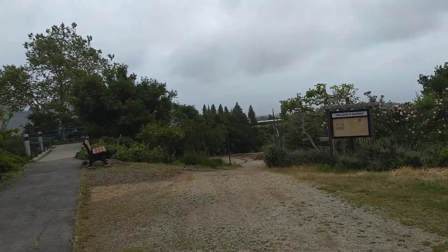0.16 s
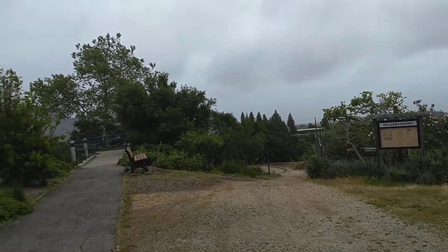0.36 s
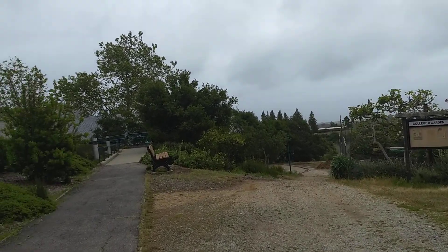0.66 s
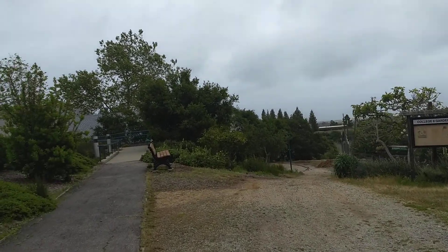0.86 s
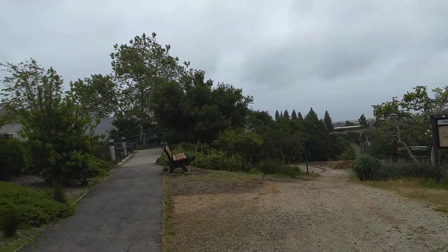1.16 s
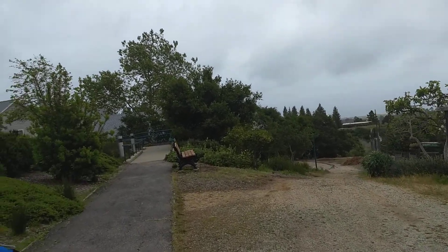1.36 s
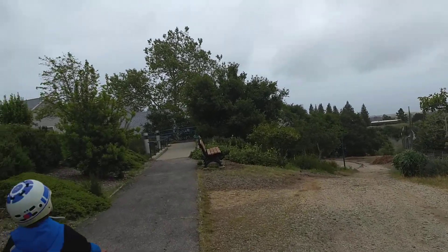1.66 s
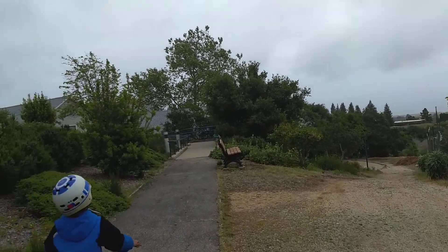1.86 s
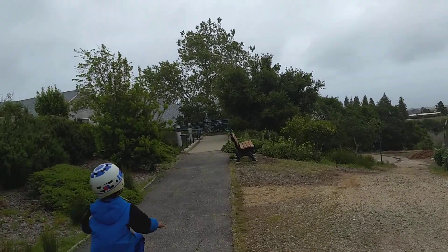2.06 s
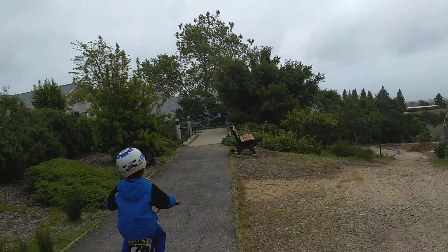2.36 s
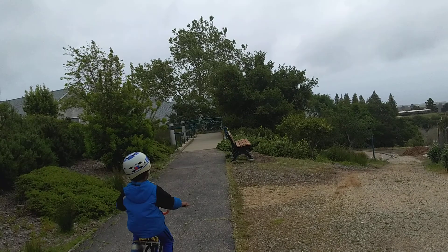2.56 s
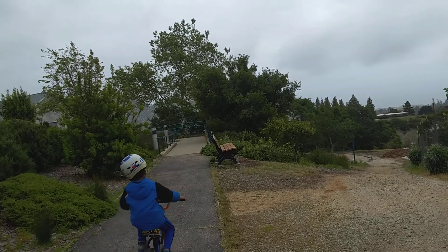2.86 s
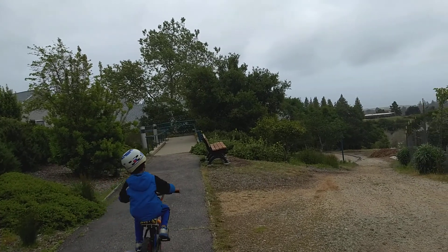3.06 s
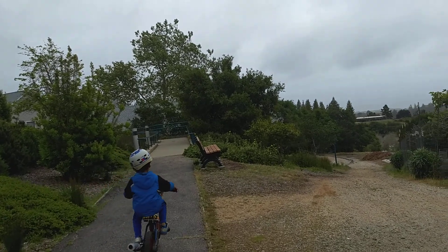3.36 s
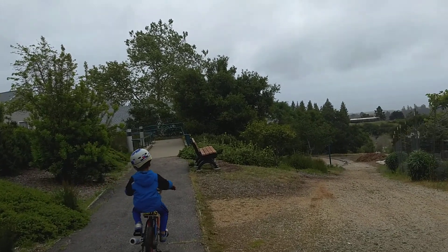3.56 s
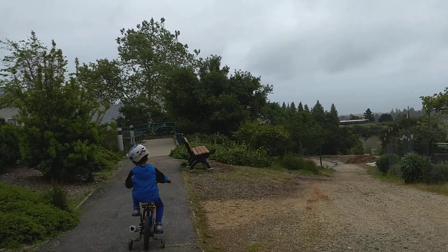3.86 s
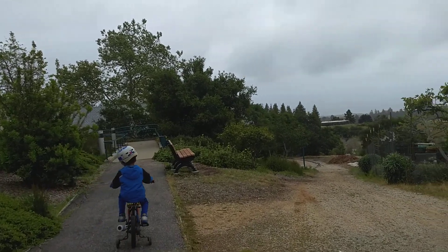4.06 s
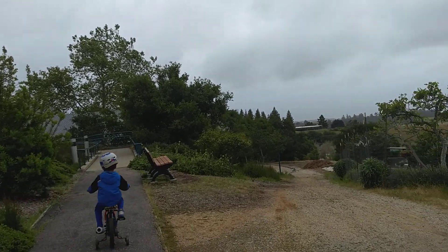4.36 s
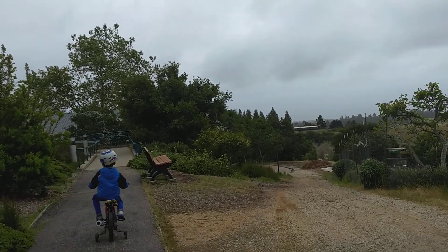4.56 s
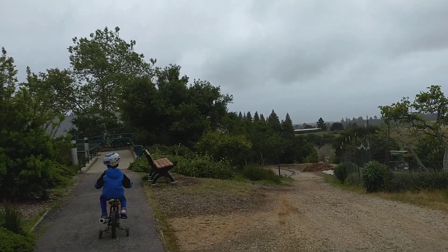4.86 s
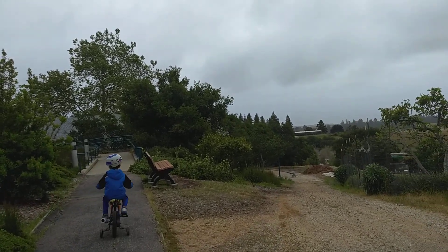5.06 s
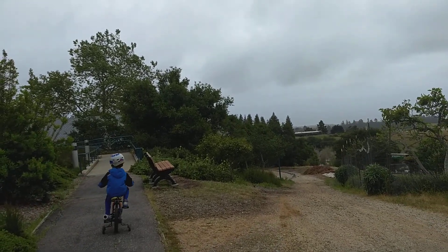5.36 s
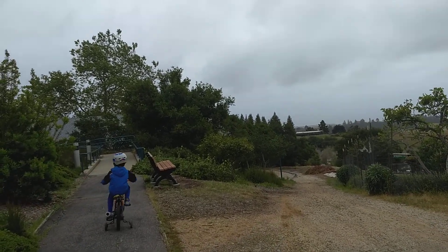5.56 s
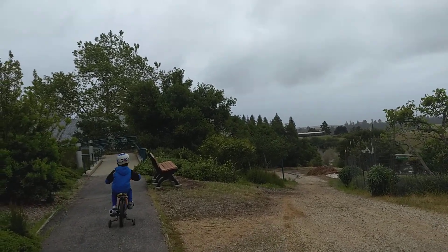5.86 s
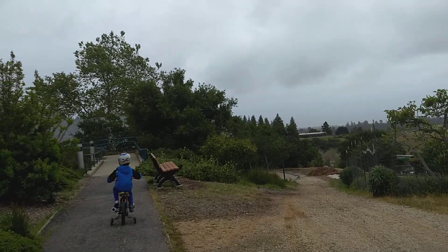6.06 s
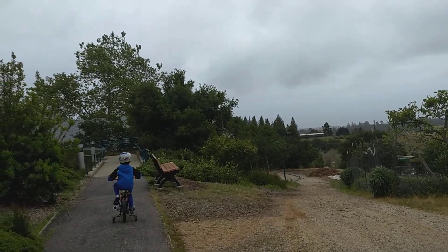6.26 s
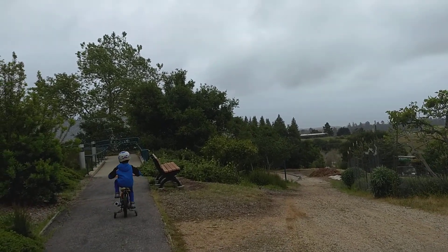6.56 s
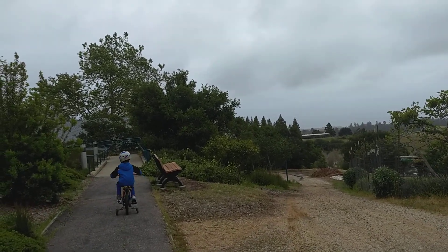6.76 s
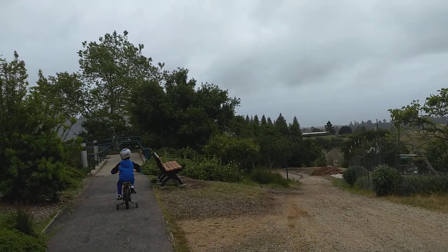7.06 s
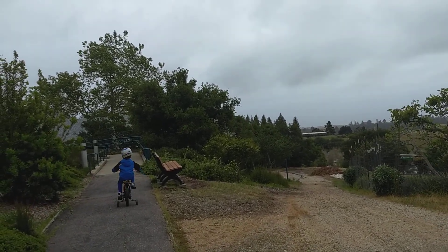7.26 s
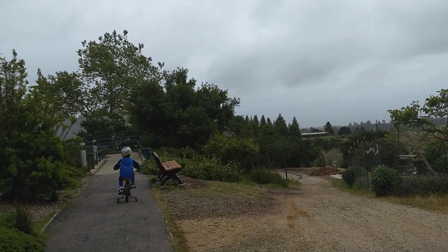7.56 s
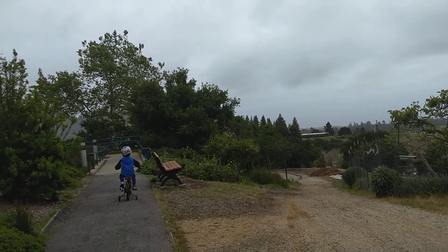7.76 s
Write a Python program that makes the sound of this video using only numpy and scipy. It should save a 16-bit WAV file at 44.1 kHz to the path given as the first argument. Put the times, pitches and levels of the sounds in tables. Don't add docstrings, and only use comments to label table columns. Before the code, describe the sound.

From 0 to about 1.1 seconds a small bicycle with hard stabiliser wheels is very close, with hollow knocks, rough gritty rolling and a dense clatter of sharp loose-frame ticks, as deep wind thumps crowd the microphone around 0.5 to 1 second. From 1.2 to 3.5 seconds bright chain clicks tick irregularly over the rumbling wheels, with another frame rattle near 2.4 and low gust pops around 2.2 to 2.5. From 3.5 to 5 seconds it draws away, thinner and softer, with a wind thump near 4.3 and a few knocks near 4.6. After 5 seconds the rolling is faint, with small uneven ticks and brief rattles around 6.2 to 6.5 and 7.1; wind swells strongly near 6.7 and returns near 7.8. A faint distant machine hum, breathy whine and dull air continue throughout. Wide outdoor stereo, with wind very uneven between the microphones.

```python
import sys
import numpy as np
from scipy import signal
from scipy.io import wavfile
from scipy.ndimage import map_coordinates

SR = 44100
rng = np.random.default_rng(int(sys.argv[2]) if len(sys.argv) > 2 else 0)


def pcm_store(signal):
    levels = np.round(np.clip(np.atleast_2d(signal), -1, 1) * 32767)
    wavfile.write(sys.argv[1], SR, levels.astype(np.int16).T)


def boost(x):
    u = np.asarray(x, float) / 20
    return 10 ** u


N = 348390


def in_time(rows):
    s, *columns = np.transpose(rows)
    return [np.interp(np.arange(N) / SR, s, c) for c in columns]


def swells(rows, edge_s):
    t = np.arange(N) / SR
    out = np.zeros((len(rows[0]) - 2, N))
    for s, length, *db in rows:
        near = slice(max(int((s - edge_s) * SR), 0), int((s + length + edge_s) * SR))
        to_edge = np.minimum(t[near] - s, s + length - t[near])
        out[:, near] += np.outer(db, np.clip(to_edge / edge_s + .5, 0, 1))
    return out


def rms_one(x):
    return x / np.sqrt(np.mean(x ** 2) + 1e-20)


def drift(rate):
    r = np.exp(-80 * np.pi * rate / SR)
    noise = rng.standard_normal(N // 40 + 2002)
    slow = signal.lfilter([1], [1, -2 * r, r * r], noise)[2000:]
    return np.interp(np.arange(N) / 40, np.arange(len(slow)), rms_one(slow))


def resonate(x, hz, width):
    r = np.exp(-np.pi * width / SR)
    b = np.sqrt((1 - r * r) / 2) * np.array([1, 0, -1])
    return signal.lfilter(b, [1, -2 * r * np.cos(2 * np.pi * hz / SR), r * r], x)


def band(x, low_hz, high_hz, order=2):
    return signal.sosfilt(signal.butter(order, [low_hz, high_hz], "band", fs=SR, output="sos"), x)


def contacts(at, sizes, t60):
    train = np.zeros(N) + 1e-18
    np.add.at(train, at, sizes)
    return signal.lfilter([1], [1, -boost(-60 / (t60 * SR))], train)


def blows(events, cycles, offset_db):
    out = np.zeros(N + SR)
    for s, peak_db, hz in events:
        turns = np.arange(int(cycles * SR / hz)) * hz / SR
        fade = boost(-40 * turns / cycles) * np.minimum(turns / 0.5, 1)
        start = int(s * SR)
        out[start:start + len(turns)] += boost(peak_db + offset_db) * np.sin(2 * np.pi * turns) * fade
    return out[:N]


# (pitch [Hz], level [dB])
MACHINE_HUM = [
    (343, -46.5),
    (361, -48),
]
# (time [s], hum [dB], whine [dB])
MACHINE_SWELL = [(0, 3.5, 4.5), (1, -5.5, 1.5), (4.2, -4, 0.5), (4.8, -1, 2.5), (5.6, 0, -6.5),
                 (7.9, -1, 4.5)]


def distance():
    t = np.arange(N) / SR
    hum_db, whine_db = in_time(MACHINE_SWELL)
    lines = [boost(db + 1.7 * drift(0.26)) * np.sin(2 * np.pi * hz * t) for hz, db in MACHINE_HUM]
    hum = sum(lines) * boost(hum_db)
    whine = boost(-49.5 + whine_db) * resonate(rng.standard_normal(N), hz=410.8, width=17)
    common, left, right = rms_one(band(rng.standard_normal((3, N)), 220, 710, order=1))
    air = boost(-55.5) * (common + 1.2 * np.array([left, right]))
    return hum * boost([[3.0], [-3.0]]) + whine * boost([[4.0], [-12.0]]) + air


# (time [s], rumble [dB], upper flutter relative [dB])
BREEZE_LEVEL = [(0.0, -51.5, -2.5), (0.7, -31.5, 3), (1.25, -57.5, 1), (2.0, -38.5, -2.5),
                (2.9, -47.5, 0.5), (3.35, -55.5, 0.5), (4.1, -44.5, -6.5), (4.9, -51.5, -9.0),
                (5.6, -43, -7.5), (6.6, -30.5, 0), (7.2, -51.0, -12), (7.9, -36.5, 1.0)]
# (start [s], length [s], rise [dB], extra rise of the flutter [dB])
GUST_RISES = [(0.0, 0.073, 11.5, 10), (0.11, 0.055, 13, -3), (0.49, 0.06, 11, -2), (0.88, 0.025, 4, 7),
              (1.01, 0.044, 11, -3), (1.2, 0.095, 8.0, 2.0), (1.47, 0.12, 6.5, 7.5), (2.16, 0.15, 9, 11),
              (2.46, 0.17, 0, 8), (2.75, 0.024, 12, -1), (2.88, 0.15, 13.0, -10), (3.04, 0.14, 18.5, -1),
              (3.4, 0.045, 14, 4), (3.59, 0.27, 12.0, -1.0), (3.95, 0.11, 18.0, 7.5), (4.29, 0.29, 10.5, 4),
              (4.77, 0.047, 13.5, -2), (4.89, 0.048, 7, 6), (5.07, 0.05, 8, -4.0), (5.27, 0.12, 5, -13),
              (5.51, 0.082, 15, -1), (5.7, 0.072, 8, 3.0), (6.02, 0.23, -3.5, -11), (6.7, 0.11, 3.5, 4),
              (6.83, 0.11, 10.5, 3.5), (7.09, 0.04, 7, 6.0), (7.2, 0.032, 5, 5), (7.25, 0.059, 14, 13),
              (7.51, 0.04, 3, 4), (7.74, 0.18, 5.5, -2)]
# (time [s], peak [dB], pitch [Hz])
EDDY_POPS = [(0.036, -40, 271), (0.505, -13.5, 145), (0.636, -13, 101), (0.714, -10.5, 115),
             (0.874, -18, 140), (1.014, -18.5, 116), (2.152, -14, 205), (2.242, -13.5, 170),
             (2.278, -15, 200), (2.497, -16, 200), (2.758, -26, 103), (3.033, -38, 86.1), (3.976, -22, 122),
             (4.319, -11, 167), (4.774, -28, 103), (5.706, -21.5, 161), (6.12, -14, 113),
             (6.273, -21, 95.5), (6.708, -15, 168), (6.838, -17, 250), (7.684, -20.5, 81.4),
             (7.803, -26, 117)]


def wind():
    rumble_db, flutter_db = in_time(BREEZE_LEVEL) + swells(GUST_RISES, edge_s=0.038)
    white = rng.standard_normal((2, 2, N))
    lumps = boost(5.0 * np.array([drift(22), drift(43.4)]))
    deep = rms_one(band(white[0] * lumps, 42.5, 150.4, order=3))
    flutter = rms_one(band(white[1] * lumps, 162, 294))
    gusts = boost(rumble_db + 18.5) * (deep + boost(flutter_db - 11.0) * flutter)
    sheltered_db = -18.5
    pops = blows(EDDY_POPS, cycles=6.4, offset_db=13.0)
    return gusts * [[boost(sheltered_db)], [1]] + pops * [[0], [1]]


# (time [s], load on the wheels [dB], frame looseness relative [dB], pull on the chain [dB])
RIDE_LEVEL = [(0.0, -34, -9, -75), (0.3, -37.5, -5.5, -41), (0.7, -34, -4, -48.5),
              (1.1, -37.5, -10.5, -45.5), (1.45, -39.5, -5.5, -42), (1.75, -34, -7.5, -35.0),
              (2.3, -35, -0.5, -44.5), (2.65, -42, -4.5, -41.5), (3.1, -39.0, -1.5, -40.0),
              (3.6, -37, -2.5, -38.5), (4.2, -38.5, -2, -41), (4.45, -41, -7, -40.0), (5.1, -50.5, -2, -55),
              (5.6, -50, -10.5, -56), (6.3, -47.5, -2.5, -61.5), (6.8, -50.0, 3.5, -43.5),
              (7.3, -46, -5, -47.5), (7.9, -51, -1, -49.0)]
# (start [s], length [s], shake of chain [dB], shake of wheels and frame [dB])
PAVING = [(0.24, 0.074, -31, -2), (0.52, 0.15, 6, 2), (1.47, 0.099, -5.5, -3), (1.56, 0.1, 4, 4.5),
          (1.74, 0.042, -25, -3), (1.93, 0.034, -11, -6.5), (2.62, 0.08, -7, -2), (2.78, 0.1, -12, 2.5),
          (3.22, 0.04, -8, -3), (3.36, 0.074, -11, -2.5), (3.68, 0.071, 0, 1), (3.78, 0.047, -13, -4.5),
          (3.99, 0.12, -5, -2.5), (4.34, 0.17, -11.5, -12), (4.61, 0.1, -11.5, -2.5), (4.74, 0.085, 5, 5.5),
          (4.98, 0.091, 7.5, 1), (5.16, 0.042, 11.5, 1), (5.38, 0.1, 8, 1), (5.82, 0.2, 11, -1.5),
          (6.03, 0.091, 5, -2.5), (6.19, 0.048, 15, -4), (6.23, 0.074, 1.5, -6), (6.38, 0.054, 7.5, 5.5),
          (6.47, 0.016, -7, 14), (6.68, 0.097, -9, 0.5), (6.91, 0.11, -8, -2.5), (7.19, 0.08, -7, -2),
          (7.45, 0.044, -9, 1.5), (7.49, 0.09, 1, 7.5)]


def ride_levels():
    load_db, loose_db, pull_db = in_time(RIDE_LEVEL)
    chain_shake_db, wheel_shake_db = swells(PAVING, edge_s=0.016)
    wheels_db = load_db + wheel_shake_db
    chain_db = pull_db + chain_shake_db
    return [wheels_db, wheels_db + loose_db, chain_db, chain_db - 7.5]


# (time [s], peak [dB], strongest pitch [Hz], bright edge relative [dB])
LOOSE_FRAME_TICKS = [(0.0575, -11.5, 3700, -32), (0.1085, -10.5, 3700, -7), (0.17, -16.5, 3000, -24),
                     (0.3932, -19, 2930, 6), (0.4708, -14, 3100, -23), (0.509, -12, 3600, -12),
                     (0.5324, -23, 3500, 4), (0.595, -29, 3530, -19), (0.625, -18, 4000, -14),
                     (0.677, -13.5, 3900, -3), (0.705, -13, 4080, -4), (0.756, -12, 3030, -21),
                     (0.804, -10.5, 3820, -6), (0.832, -19, 3680, -23), (0.9008, -11.5, 3470, -26),
                     (0.951, -22, 3350, -12), (1.023, -5, 3830, -32), (1.0967, -11, 3240, -4),
                     (1.348, -18, 3400, -24), (2.173, -11, 3030, -18), (2.355, -9, 3020, -8),
                     (2.4186, -11.5, 3000, -25), (2.4336, -12.5, 3100, -24), (3.4676, -14.5, 2980, -17),
                     (6.2173, -13, 8100, 0), (6.4791, -15, 2850, -11), (6.499, -20, 2900, -27)]
# (time [s], peak [dB], bright edge relative [dB])
CHAIN_TICKS = [(0.139, -18.5, 6.5), (0.3151, -11, -2), (0.4437, -7, -3), (1.1799, -21, 1),
               (1.2835, -10.5, -18), (1.4554, -19, -5), (1.5128, -22, -12), (1.5602, -18, -19),
               (1.5924, -20, -20), (1.6195, -27, -11), (1.7052, -24, -5), (1.73, -14, 3),
               (1.7799, -10, -14), (1.8195, -17, -9), (1.8422, -19, -17), (1.9037, -12, 2),
               (1.9778, -10, -10), (2.009, -18, -8), (2.0926, -16, -7), (2.3185, -16, -10),
               (2.5125, -17.5, 1), (2.735, -26, -12), (2.8392, -20.5, 1.5), (2.8804, -18, -13),
               (3.031, -11, -0.5), (3.2226, -15.5, -2), (3.266, -16, -6), (3.279, -19, -1),
               (3.4418, -21.5, -8), (3.6561, -13, -8),
               (3.907, -13, -17), (4.1866, -20, -18), (4.265, -18.5, -13), (4.295, -21, -15),
                   (4.473, -22, -9), (4.706, -22.5, -6), (4.879, -18.5, -20), (4.98, -21, -21),
                   (5.0246, -21.5, -19), (5.0866, -22.5, -20), (5.1882, -24, -18), (5.2805, -17, -14),
                   (5.3936, -21.5, -11), (5.5693, -21.5, -19), (5.6291, -18.5, -6), (5.8168, -23, 0),
                   (5.845, -21, -15), (6.019, -21, -16), (6.0517, -17.5, -3), (6.755, -15.5, -16),
                   (6.9585, -19, -15), (7.0265, -24, -4), (7.0503, -15.5, 0.5), (7.0834, -20, 0),
                   (7.112, -18, -2), (7.3266, -43, -18), (7.377, -20, -19), (7.8105, -21, -9),
                   (7.8222, -18, -15)]


def ticks():
    chain_hz = 6300
    chain = [(s, db, chain_hz, edge) for s, db, edge in CHAIN_TICKS]
    return np.transpose(LOOSE_FRAME_TICKS + chain)


# (time [s], peak [dB], pitch [Hz])
WHEEL_KNOCKS = [(0.106, -11, 915), (0.124, -6.5, 940), (0.168, -16, 950), (0.231, -18, 920),
                (0.248, -16.5, 910), (0.315, -20, 900), (0.372, -17.5, 890), (0.508, -14.5, 950),
                (0.533, -17, 910), (0.578, -19.5, 990), (0.626, -16, 905), (0.831, -19, 1030),
                (0.899, -20.5, 830), (1.025, -14, 980), (1.343, -25, 710), (1.637, -14, 1260),
                (1.899, -22, 750), (1.953, -21, 685), (2.882, -24, 700), (3.442, -24.5, 736),
                (3.467, -28, 775), (4.575, -17.5, 1440), (4.598, -26, 1020)]


def wheel_knocks():
    knocks = blows(WHEEL_KNOCKS, cycles=14.0, offset_db=-2.5)
    return np.array([knocks, 0.44 * knocks, 0 * knocks])


# (pitch [Hz], likeness [0-1], left over right [dB])
PORT_PICKUP = [(560, 0.89, 4), (2080, 0.54, 0.5), (3800, 0.96, 1), (6040, 0.41, -9.5), (9330, 0.1, 28.5),
               (15600, 1, 9)]


def at_ports(near, other, hz):
    port_hz, likeness, lean_db = np.transpose(PORT_PICKUP)
    alike = np.clip(np.interp(np.log(hz), np.log(port_hz), likeness), 0, 1)
    lean = boost(np.interp(np.log(hz), np.log(port_hz), lean_db) / 2)
    return [lean * near, alike * near / lean, np.sqrt(1 - alike ** 2) * other / lean]


# (time [s], lag of the right port [samples])
BIKE_BEARING = [(0, 11.65), (.9, 10.85), (1.5, 8.6), (2.1, 5.8), (4, 6.56), (7.9, 5.6)]


def pass_by(left, shared, right_own):
    lag = in_time(BIKE_BEARING)[0]
    later = map_coordinates(shared, [np.arange(N) - lag], order=3)
    return np.array([left, later + right_own])


# (pitch [Hz], width [Hz], level [dB])
BODY_RESONANCES = [(538, 380, -10), (915, 410, -11.5), (1400, 890, -13), (2208, 57, -13),
                   (3038, 400, -11.5), (3700, 420, -15.5), (4474, 130, -13), (5240, 730, -14.5),
                   (6070, 600, -16), (7610, 2900, -16.5), (10850, 2400, -26), (14500, 3700, -20)]


def bicycle():
    grit_t60 = 0.01 * np.array([3.3, 4.0, 1.3, 0.91])
    grit_db = [-8.0, 0.0, 2.65, 7.0]
    hiss_db = -10.5 + np.array([0.0, 0.0, 1.0, -1.0])
    crack_db = [6.0, 7.0, 8.0, 12.0]

    levels_db = ride_levels()
    s, peak_db, tick_hz, bright_db = ticks()
    tick_at = np.minimum((s + .001) * SR, N - 1).astype(int)
    tick_colour = rng.standard_normal((len(s), len(BODY_RESONANCES)))
    grains = rng.random((2200, 3))
    grain_at = (grains[:, 0] * N).astype(int)
    size_db = 3.0 * np.minimum(-np.log(grains[:, 1] + 1e-9), 4.0)
    grain_hz = 700 * 2 ** (4.42 * grains[:, 2])
    grain_colour = rng.standard_normal((2200, len(BODY_RESONANCES)))
    white = rng.standard_normal((2, 2, N))
    airborne = np.clip(contacts(N - 1 - tick_at, 0.27, 0.12)[::-1], 0, .9)

    out = wheel_knocks()
    for k, (hz, width, body_db) in enumerate(BODY_RESONANCES):
        part = np.searchsorted([1800, 4200, 7000], hz)
        fading_db = -.3 * max(np.log2(hz / 7900), 0)
        level_db = levels_db[part] + 7.5 + fading_db * np.arange(N) / SR

        grain_db = size_db - 7.8 * np.abs(np.log2(hz / grain_hz)) + 2.5 * grain_colour[:, k]
        grit = rms_one(contacts(grain_at, boost(grain_db), grit_t60[part]))
        hiss = boost(hiss_db[part] + 5.2 * drift(14.4))
        rolling = boost(level_db) * (1 - airborne) * (boost(grit_db[part]) * grit + hiss)

        if part == 3:
            tint_db = bright_db + fading_db * s - 1.0
        else:
            tint_db = -9.0 * np.abs(np.log2(hz / tick_hz))
        strength = boost(peak_db + tint_db + tick_colour[:, k])
        scrape = contacts(tick_at, strength, 0.012)
        crack = boost(crack_db[part]) * contacts(tick_at, strength, 1 / SR)

        shaken = (rolling + scrape) * white[k % 2] + crack
        near, other = (-1) ** k * boost(body_db) * resonate(shaken, hz, width)
        out += at_ports(near, other, hz)
    return pass_by(*out)


def scene():
    return distance() + wind() + bicycle()


def roll_off(x):
    return signal.sosfilt(signal.butter(12, 16990, fs=SR, output="sos"), x)


def record(dry):
    lag, gain, dull = 19, .815, 0.29
    late = signal.lfilter(np.r_[np.zeros(lag), gain * (1 - dull)], [1, -dull], dry[::-1])
    low_cut = signal.butter(3, 50, "high", fs=SR, output="sos")
    treble_limit = signal.ellip(10, .5, 45, 15900 - 80, fs=SR, output="sos")
    wide = signal.sosfilt(treble_limit, signal.sosfilt(low_cut, dry - late))
    mix = .9 * np.tanh(wide / 0.92)
    return roll_off(mix)


dry = scene()
out = record(dry)
pcm_store(out)
```